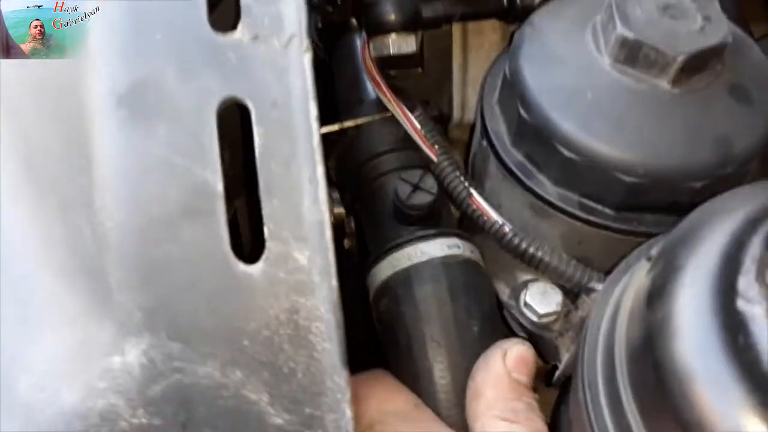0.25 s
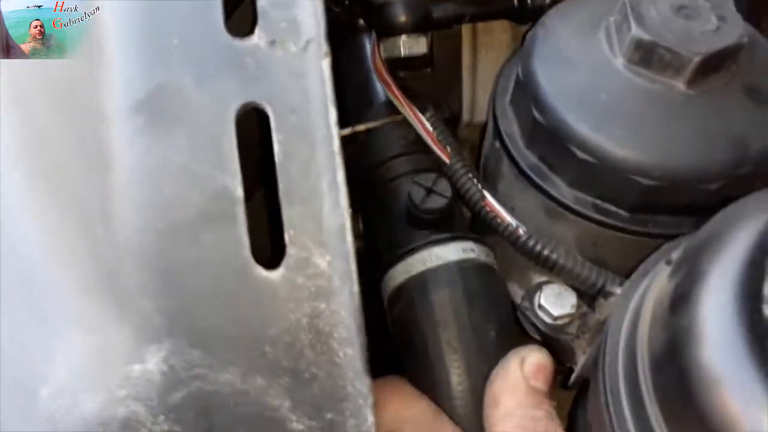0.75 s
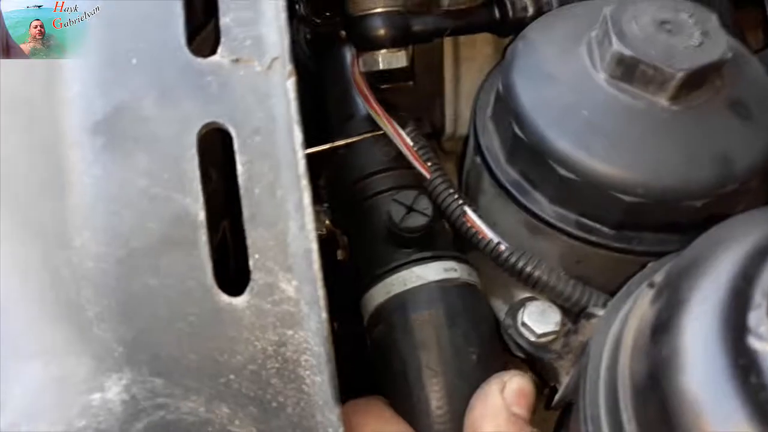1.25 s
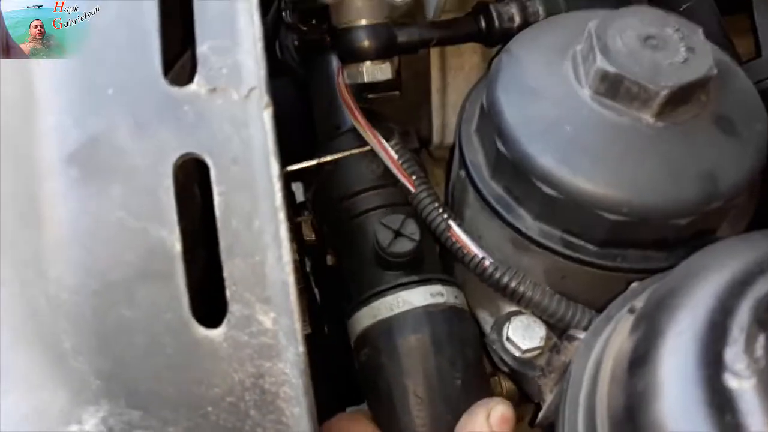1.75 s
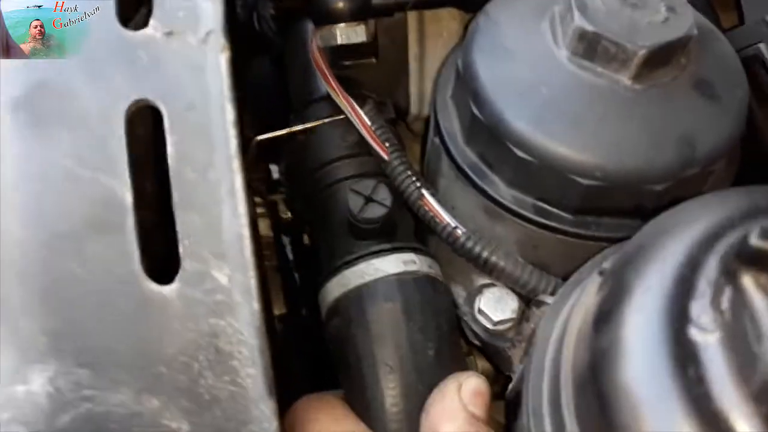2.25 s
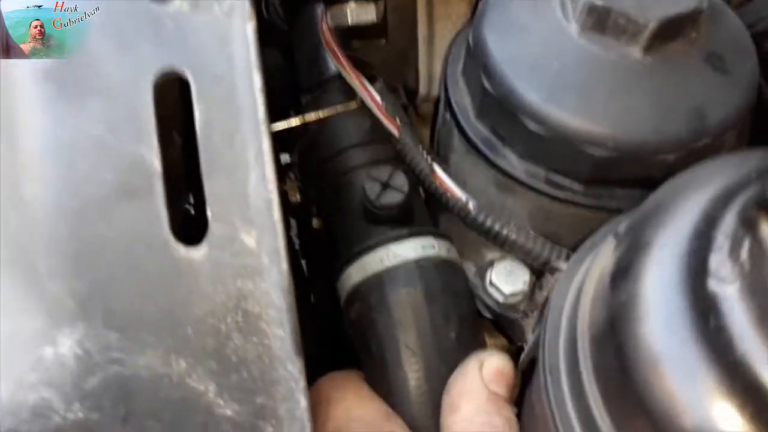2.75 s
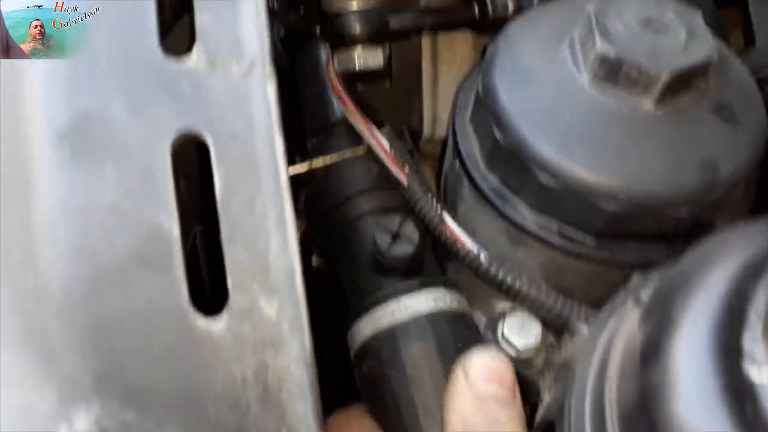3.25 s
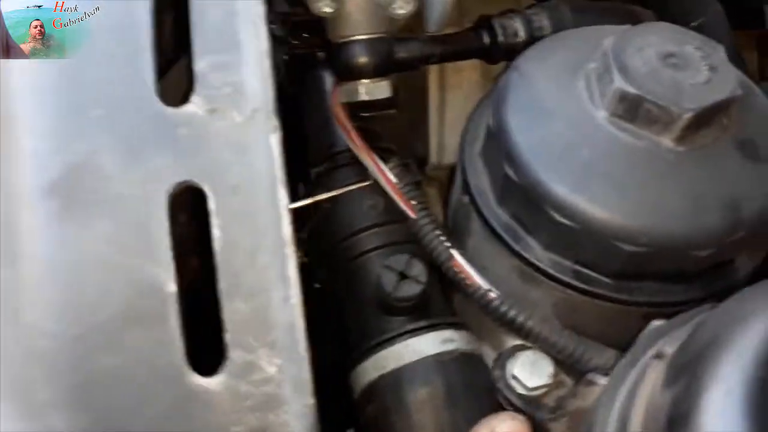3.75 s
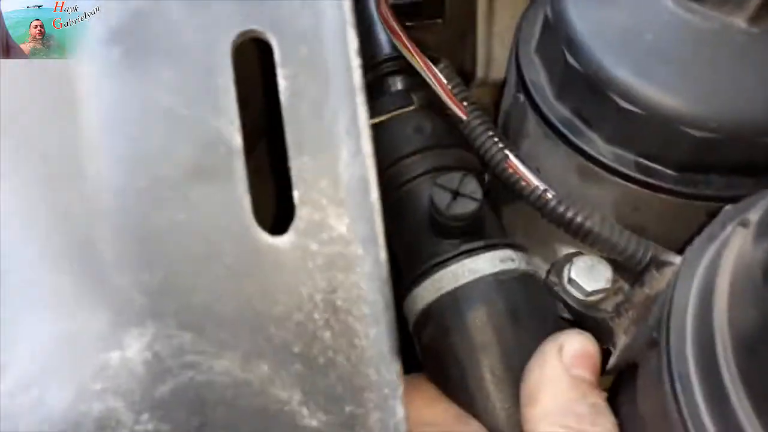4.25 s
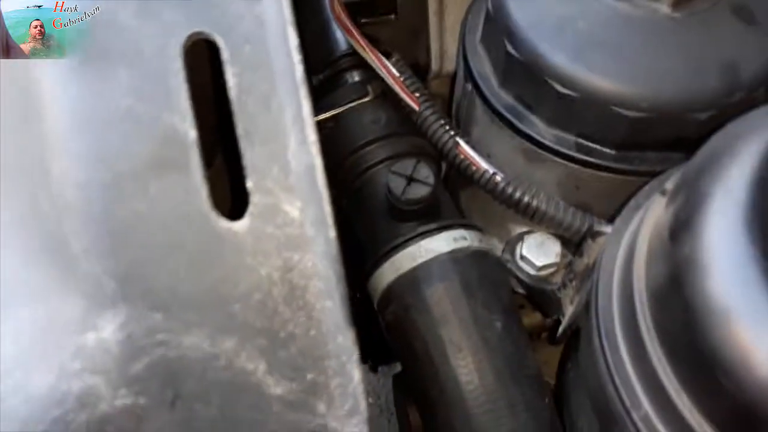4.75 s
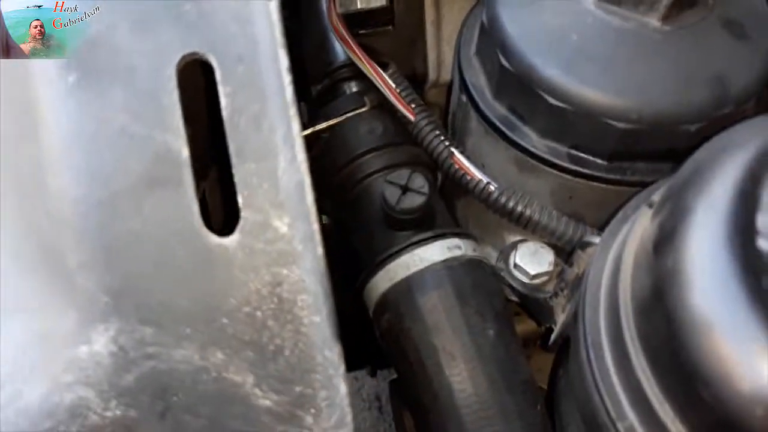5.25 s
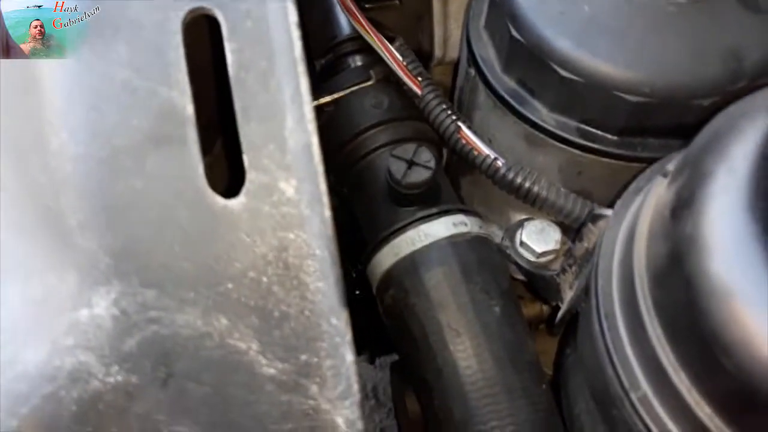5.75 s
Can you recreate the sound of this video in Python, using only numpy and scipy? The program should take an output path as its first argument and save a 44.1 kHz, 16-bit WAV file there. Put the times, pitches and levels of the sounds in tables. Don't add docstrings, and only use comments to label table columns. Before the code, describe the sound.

Close up in an engine bay, a hand works a rubber hose: low rubbing, plastic creaks and damped thuds. Coolant spatters in short spurts on metal and plastic, with ringing drips and bubbly gurgles. It thins out around the middle, then a sharp splashy burst comes just after four seconds and the hardest knock around five and a half. A faint low hum sits behind; near-mono, short metallic reflections.

```python
import sys
import numpy as np
from scipy import signal
from scipy.fft import rfft, irfft
from scipy.io import wavfile
from scipy.ndimage import uniform_filter1d

SR = 44100
rng = np.random.default_rng(int(sys.argv[2]) if len(sys.argv) > 2 else 0)


def linear_from_db(decibels):
    return 10 ** (np.asarray(decibels, float) / 20)


def to_wav(s):
    ch = np.atleast_2d(s).T
    pcm = np.round(np.clip(ch, -1, 1) * 32767)
    wavfile.write(sys.argv[1], SR, pcm.astype(np.int16))


N = 264600
T = np.arange(N) / SR


def rms_one(x):
    return x / np.sqrt(np.mean(x ** 2) + 1e-20)


def colour(x, spectrum):
    hz, db = np.transpose(spectrum)
    grid = np.linspace(1, SR / 2, 4097)
    log_gain = np.interp(np.log(grid), np.log(hz), np.maximum(db, -70)) * np.log(10) / 20
    cepstrum = irfft(log_gain)
    cepstrum[1:4096] *= 2
    cepstrum[4097:] = 0
    response = irfft(np.exp(rfft(cepstrum)))
    return signal.fftconvolve(x, response)[:len(x)]


def drift(rate):
    r = np.exp(-80 * np.pi * rate / SR)
    noise = rng.standard_normal(N // 40 + 2002)
    slow = signal.lfilter([1], [1, -2 * r, r * r], noise)[2000:]
    return np.interp(np.arange(N) / 40, np.arange(len(slow)), rms_one(slow))


def ring(clicks, hz, t60):
    r, w = linear_from_db(-60 / (t60 * SR)), 2 * np.pi * hz / SR
    return signal.lfilter([0, np.sin(w)], [1, -2 * r * np.cos(w), r * r], clicks + 1e-18)


def grains(per_s, spread_db, clump_db):
    size_db = spread_db * np.minimum(rng.exponential(1, N), 5) + clump_db * drift(25.7)
    sizes = linear_from_db(size_db) * rng.choice([-1, 1], N)
    return rms_one(sizes * (rng.random(N) < per_s / SR))


def droplets(clicks, spectrum, cycles, count=18):
    pitches = np.geomspace(spectrum[1][0], spectrum[-3][0], count)
    dealt = rng.integers(0, count, N)
    rings = sum(ring(clicks * (dealt == k), hz, cycles / hz) for k, hz in enumerate(pitches))
    return colour(rings, spectrum)


def struck(clicks, drops, spectrum, modes, ring_db, drop_db, cycles):
    crackle = rms_one(colour(clicks, spectrum))
    rings = sum(linear_from_db(db + 4.7 * drift(15.2)) * ring(clicks, hz, t60) for hz, t60, db in modes)
    pitched = rms_one(droplets(drops, spectrum, cycles))
    return rms_one(crackle + linear_from_db(ring_db) * rms_one(rings) + linear_from_db(drop_db) * pitched)


def swells(s, db, rise_s, fall_s):
    sparse = T[::32]
    late = sparse - s[:, None]
    drop = np.maximum(-late / rise_s[:, None], late / np.reshape(fall_s, (-1, 1)))
    gain = linear_from_db(db[:, None] - 12 * drop)
    return np.interp(T, sparse, gain.sum(axis=0))


def falls(events, t60s, rise_s):
    for (s, db, *_), t60 in zip(events, np.broadcast_to(t60s, len(events))):
        at = round(s * SR)
        t = T[:min(N - at, SR // 4)]
        yield at, t, linear_from_db(db - 60 * t / t60) * (1 - np.exp(-t / rise_s))


def tones(events, t60s, level_db, rise_s, glide, wobble_db, wobble_hz, wander=0.62):
    out, wobble = np.zeros(N), drift(wobble_hz)
    for (at, t, envelope), (_, _, hz, *_) in zip(falls(events, t60s, rise_s), events):
        phase = 2 * np.pi * hz * t * (1 + glide * t) + wander * wobble[at:at + len(t)]
        out[at:at + len(t)] += envelope * np.sin(phase)
    return linear_from_db(level_db + wobble_db * wobble) * out


def snaps(events, spectrum, level_db, t60):
    out = np.zeros(N)
    for at, t, envelope in falls(events, t60, rise_s=0.0015):
        out[at:at + len(t)] += envelope
    return linear_from_db(level_db) * out * rms_one(colour(rng.standard_normal(N), spectrum))


# (time [s], frequency [Hz], level [dB])
DRONE_PITCHES = [(0.0, 123, -34), (0.221, 107, -38), (0.77, 116, -45), (0.9, 95.1, -45), (1.069, 150, -40),
                 (1.321, 96.4, -69), (1.49, 150, -29.5), (1.62, 147, -43), (1.698, 104, -59),
                 (2.339, 149, -46.5), (2.46, 98.9, -56.5), (3.709, 92.2, -52.5), (4.459, 126, -51),
                 (4.66, 88.6, -58), (4.849, 124, -41.5), (5.35, 127, -44), (6.0, 102, -59)]


def drone(width_hz=8, broad_db=-6):
    s, hz, db = np.transpose(DRONE_PITCHES)
    pitch_hz = hz[np.searchsorted((s[1:] + s[:-1]) / 2, T)]
    phase = 2 * np.pi * np.cumsum(pitch_hz) / SR
    narrow = drift(width_hz / 2) * np.cos(phase) + drift(width_hz / 2) * np.sin(phase)
    narrow = narrow + 0.59 * np.sin(phase)
    band = signal.butter(2, [75, 170], "band", fs=SR, output="sos")
    broad = signal.sosfilt(band, rng.standard_normal(N))
    return linear_from_db(np.interp(T, s, db) - 6.5) * rms_one(rms_one(narrow) + linear_from_db(broad_db) * rms_one(broad))


def hiss_cut(x):
    return signal.sosfilt(signal.cheby2(12, 40, 15250, fs=SR, output="sos"), x)


# (frequency [Hz], level [dB per Hz])
AIR_SPECTRUM = [(15, -76), (25, -8), (107, 11.5), (169, -1.5), (267, -3.5), (650, -23), (1270, -21),
                (1670, -23.5), (3100, -40), (5460, -21), (7340, -66), (14400, -36.5), (15600, -33)]


def room_air():
    level_db = -52 + 2.76 * drift(1.94)
    return hiss_cut(linear_from_db(level_db) * rms_one(colour(rng.standard_normal(N), AIR_SPECTRUM)))


# (frequency [Hz], level [dB per Hz])
SIDE_SPECTRUM = [(180, -50), (300, -12), (661, -8.5), (1340, -11.5), (3210, -6.5), (15300, -11)]


def side_hiss(near):
    loudness = np.sqrt(uniform_filter1d(near ** 2, size=1024) + 1e-12) / linear_from_db(-48.0)
    hiss = hiss_cut(rms_one(colour(rng.standard_normal(N), SIDE_SPECTRUM)))
    return linear_from_db(-75.5) * loudness ** 0.033 * hiss


# (frequency [Hz], level [dB per Hz])
SPATTER_SPECTRUM = [(1000, -30), (1700, -9.5), (1940, -4.5), (2150, -8), (2730, -4), (3050, 4.5),
                    (4080, -1.5), (4890, -2.5), (8000, -25.5), (10400, -74), (17600, -120)]
# (frequency [Hz], T60 [s], level [dB])
SHIELD_MODES = [(2960, 0.0094, 8), (3110, 0.013, -16), (3600, 0.016, -6), (4640, 0.0086, -37),
                (2596, 0.0057, 3)]


def shield_spatter():
    wet = grains(8000, spread_db=2.5, clump_db=0.5)
    beads = grains(900, spread_db=1.5, clump_db=1.5)
    return struck(wet, beads, SPATTER_SPECTRUM, SHIELD_MODES, ring_db=-0.5, drop_db=-2.5, cycles=51)


# (time [s], level [dB])
TRICKLE_LEVELS = [(0.0, -54), (0.28, -51.5), (0.78, -55), (1.1, -47.5), (2.0, -63), (2.22, -65),
                  (2.54, -54), (2.99, -61.5), (3.16, -55.5), (3.56, -79), (4.16, -54), (4.34, -60.5),
                  (4.44, -63), (4.61, -56.5), (4.73, -56.5), (5.13, -51.5), (6.0, -50)]


def trickle(spatter):
    s, db = np.transpose(TRICKLE_LEVELS)
    trickle_db = np.interp(T, s, db)
    thin = signal.sosfilt(signal.butter(4, 2170, "high", fs=SR, output="sos"), spatter)
    return linear_from_db(trickle_db - 2.5) * thin, trickle_db


# (time [s], plastic creak level [dB], hose rub level [dB], build-up [s])
TUGS = [(0.0, -50.5, -34.5, .03), (0.381, -62, -38.5, 0.01), (.85, -65, -41, 0.16), (.95, -46.5, -58, 0.15),
        (1.05, -36.5, -38.5, 0.045), (1.219, -39, -40.5, 0.0094), (1.4, -46, -44, 0.071),
        (1.623, -41.5, -38.5, 0.06), (1.948, -49.5, -42, 0.044), (2.109, -53.5, -46, 0.022),
        (2.299, -56, -50.5, 0.069), (2.59, -46.5, -33, 0.047), (3.04, -43.5, -49, 0.04),
        (3.292, -43.5, -46.5, 0.14), (3.88, -57, -38.5, 0.17), (4.108, -39.5, -28, 0.0079),
        (4.48, -50.5, -78, 0.028), (4.83, -61, -44, 0.18), (4.98, -40.5, -46, 0.0073),
        (5.26, -45, -46.5, 0.13), (5.56, -38, -51, 0.018), (5.971, -45, -61, 0.097), (6.0, -70, -33, 0.067)]


def tug_gains():
    s, creak_db, rub_db, rise_s = np.transpose(TUGS)
    fall_s, rest_db = 0.085, -57
    twisting = swells(s, creak_db, rise_s, fall_s)
    rubbing = swells(s, rub_db, rise_s, fall_s) + linear_from_db(rest_db)
    return twisting, rubbing


# (frequency [Hz], level [dB per Hz])
CREAK_SPECTRUM = [(260, -28), (450, -10), (669, -7), (1100, 2), (1240, 5.5), (1440, -0.5), (2300, -1),
                  (2990, -65), (5060, -120)]
# (frequency [Hz], T60 [s], level [dB])
HOUSING_MODES = [(1240, 0.066, 1), (1010, 0.078, -2), (850, 0.034, 0), (775.5, 0.049, -2),
                 (1475, 0.079, -12.5), (2100, 0.029, -8)]


def housing_creak(twisting, trickle_db):
    dry_slips = grains(4000, spread_db=2.5, clump_db=-1.5)
    slips = grains(400, spread_db=1.2, clump_db=1.5)
    creak = struck(dry_slips, slips, CREAK_SPECTRUM, HOUSING_MODES, ring_db=-4.0, drop_db=-15.0, cycles=31)
    slack = signal.sosfilt(signal.butter(4, 1580, fs=SR, output="sos"), creak)
    return linear_from_db(-3.5) * (twisting * creak + linear_from_db(trickle_db - 3.5) * slack)


# (frequency [Hz], level [dB per Hz])
HOSE_SPECTRUM = [(88, -44), (150, -2.5), (264, 1.5), (436, -6.5), (478, -10.5), (650, -17.5), (840, -37.5),
                 (1430, -120)]


def hose_rub(rubbing):
    rub = grains(1500, spread_db=3.5, clump_db=1.16)
    return linear_from_db(-6.5) * rubbing * rms_one(colour(rub, HOSE_SPECTRUM))


# (frequency [Hz], level [dB per Hz])
SPRAY_SPECTRUM = [(3820, -43), (6500, -19), (6970, -14), (7530, -3.5), (9690, -11), (11600, -5),
                  (13700, -8), (15600, -10.5)]
# (time [s], level [dB], build-up [s], fall [s])
PUFFS = [(.9, -73, 0.11, 0.065), (1.05, -79, .2, .06), (2.61, -70, 0.082, 0.036), (4.01, -80, 0.058, .06),
         (4.107, -48, 0.0027, .01), (4.14, -62, 0.018, .03), (4.5, -59, 0.078, .06),
         (4.71, -58.5, 0.044, 0.046), (5.268, -54.5, 0.015, 0.03), (5.554, -58, .002, 0.0074),
         (5.585, -72, 0.028, 0.035), (5.677, -66, .003, .01), (5.75, -57, 0.015, 0.017),
         (5.97, -68, 0.047, .06)]


def fine_spray():
    mist = grains(9000, spread_db=3.0, clump_db=3.5)
    spraying = swells(*np.transpose(PUFFS)) + linear_from_db(-79)
    return linear_from_db(-4.0) * spraying * rms_one(colour(mist, SPRAY_SPECTRUM))


# (time [s], peak level [dB], ring frequency [Hz], T60 [s])
THUDS = [(0.025, -30, 200, 0.075), (.086, -37, 277, 0.048), (.165, -34, 273, 0.1), (0.374, -47, 304, .05),
         (0.413, -38.5, 450, 0.027), (0.779, -36.5, 395, 0.066), (1.214, -31, 175, 0.056),
         (1.365, -36, 376, 0.06), (1.564, -31.5, 160, 0.034), (1.939, -29, 232, 0.024),
         (1.955, -33.5, 250, 0.096), (2.552, -23, 318, 0.046), (3.154, -38, 395, 0.041),
         (3.583, -46, 300, 0.021), (3.636, -39, 253, 0.18), (3.737, -35.5, 296, 0.03),
         (3.776, -34, 258, 0.046), (3.81, -31, 265, 0.097), (3.835, -32, 250, .09), (3.894, -55, 346, .03),
         (3.924, -36, 234, 0.053), (4.744, -41, 260, 0.041), (4.106, -19, 303, 0.015),
         (4.127, -25.5, 254, 0.064), (5.555, -25, 214, 0.14), (5.675, -39.5, 258, 0.089),
         (5.953, -34, 356, 0.068), (5.965, -32, 272, .06), (5.984, -23.5, 259, 0.099),
         (4.971, -36, 230, 0.076), (5.351, -31.5, 230, 0.059)]


def hose_thuds():
    t60s = np.array(THUDS)[:, 3]
    thuds = tones(THUDS, t60s, level_db=-3.5, rise_s=0.001, glide=-1.1, wobble_db=-6.0, wobble_hz=31)
    return thuds + snaps(THUDS, HOSE_SPECTRUM, level_db=-5.5, t60=0.047)


# (time [s], length [s], level [dB])
ON_HOSE = [(0.145, 0.048, -52.5), (0.218, 0.021, -44), (0.362, 0.0061, -42), (0.463, 0.04, -46.5),
           (0.918, 0.035, -36.5), (1.502, 0.0079, -39), (1.603, 0.053, -44), (1.936, 0.0067, -42),
           (2.07, 0.076, -49), (2.538, 0.013, -41), (3.061, 0.052, -44.5), (3.282, 0.036, -41.5),
           (3.801, 0.061, -48), (4.995, 0.033, -44), (5.186, 0.1, -39.5), (5.906, 0.027, -41),
           (5.936, 0.029, -31.5)]
ON_SHIELD = [(.102, 0.03, -42.5), (.388, 0.024, -43.5), (.433, 0.028, -44), (1.036, 0.064, -41.5),
             (1.21, 0.022, -35.5), (3.018, 0.033, -43.5), (3.207, 0.031, -43.5), (3.249, 0.017, -42),
             (3.618, 0.031, -52), (4.753, 0.027, -52), (4.965, 0.023, -34), (5.028, 0.063, -40.5),
             (5.561, .036, -32), (5.545, 0.0054, -32), (5.602, 0.014, -42), (5.615, 0.049, -43),
             (5.843, 0.019, -43)]
ON_BRACKET = [(1.689, 0.016, -44), (1.707, 0.042, -47.5), (2.227, 0.025, -50), (2.398, 0.085, -49),
              (2.551, 0.055, -40.5), (2.988, 0.048, -44.5), (3.335, .05, -53), (3.468, 0.026, -50.5),
              (3.517, .01, -53), (3.583, 0.031, -54), (3.962, 0.051, -44.5), (3.92, 0.026, -56),
              (4.118, 0.012, -31.5), (4.129, 0.015, -24.5), (4.216, 0.0091, -71), (4.232, 0.018, -49),
              (4.312, 0.039, -50), (4.651, 0.048, -43), (4.77, 0.083, -48.5), (5.384, 0.011, -38.5),
              (5.735, 0.017, -34), (5.963, 0.031, -38.5)]
ON_WIRES = [(0.703, 0.0048, -44.5), (.849, 0.058, -44), (.95, 0.098, -45.5), (1.291, 0.085, -47),
            (1.809, 0.0073, -48), (1.898, 0.061, -51), (2.029, 0.0071, -48.5), (2.253, 0.015, -46),
            (2.277, 0.045, -48.5), (2.598, 0.045, -51), (2.652, 0.0069, -45), (3.54, 0.0099, -52),
            (3.669, 0.07, -50), (4.104, 0.0049, -22.5), (4.354, 0.067, -44.5), (4.415, 0.083, -39),
            (4.512, 0.048, -49), (4.688, .043, -39), (5.251, 0.02, -36.5), (5.664, 0.015, -48)]
SHARPNESS = [1.03, 2.8, 1.55, 1.12]


def spurts(spatter, peak_db=1.5, edge_s=0.0024):
    out, flow = np.zeros(N), np.zeros(N)
    surfaces = (ON_HOSE, ON_SHIELD, ON_BRACKET, ON_WIRES)
    brightest_hz = (2070, 2950, 3570, 5100)
    for rows, hz, sharpness in zip(surfaces, brightest_hz, SHARPNESS):
        for s, length_s, db in rows:
            at = round(s * SR)
            t = T[:min(N - at, round((2 * length_s + 6 * edge_s) * SR))]
            soft_s = edge_s + 0.12 * length_s
            rise = 1 - np.exp(-t / (0.75 * soft_s))
            gate = linear_from_db(db) * rise * np.exp(-np.maximum(t - length_s, 0) / soft_s)
            part = spatter[at:at + len(t)]
            bright = signal.lfilter(*signal.iirpeak(hz, sharpness, fs=SR), part)
            out[at:at + len(t)] += gate * rms_one(part + linear_from_db(peak_db) * rms_one(bright))
            flow[at:at + len(t)] += gate
    return linear_from_db(-3.5) * out, flow


# (time [s], peak level [dB], frequency [Hz])
DROPS = [(.105, -37, 3120), (0.142, -36, 3080), (.995, -43, 1250), (1.04, -35, 2910), (1.062, -39, 1263),
         (1.112, -35.5, 2930), (1.23, -36, 992), (1.305, -39.5, 1248), (1.396, -40, 3030),
         (1.43, -44.5, 3000), (1.58, -40, 3020), (1.78, -48.5, 1247), (.445, -40, 3320), (1.64, -38, 2750),
         (2.122, -46, 2110), (2.252, -41, 4910), (2.28, -47.5, 1380), (2.296, -39.5, 3030),
         (2.652, -40, 5000), (3.041, -35, 1243), (3.22, -46, 1308), (3.258, -36, 3300), (3.484, -49, 3180),
         (3.519, -56, 4280), (3.545, -51, 3020), (3.595, -46.5, 3500), (3.625, -48, 1300),
         (3.632, -42, 2960), (3.782, -45, 2450), (3.92, -48, 3550), (3.945, -49.5, 1390), (4.37, -47, 1380),
         (4.398, -46, 1420), (4.466, -38.5, 1292), (4.489, -32.5, 3224), (4.499, -45, 1400),
         (4.7, -36, 4870), (4.809, -52, 404), (4.87, -50.5, 1210), (5.006, -43, 1200), (5.039, -40, 1196),
         (5.075, -42, 1204), (4.756, -37.5, 3100), (4.97, -36, 2950), (4.97, -35, 1150),
         (5.506, -37.5, 3605), (5.074, -38, 2950), (5.217, -51, 6740), (5.264, -34, 4790),
         (5.352, -38, 506), (5.576, -42, 6720), (5.577, -24, 2830), (5.609, -33, 2870), (5.628, -53, 7000),
         (5.645, -53, 7000), (5.795, -62, 7800), (5.848, -34, 2730)]


def ringing_drops():
    t60s = 0.044 + 20 / np.array(DROPS)[:, 2]
    return tones(DROPS, t60s, level_db=2.0, rise_s=0.0025, glide=0.14,
                 wobble_db=4.0, wobble_hz=122, wander=1.0)


# (time [s], peak level [dB], frequency [Hz])
BUBBLES = [(.112, -38, 1800), (.122, -39, 4970), (.158, -37.5, 1960), (.405, -38.5, 1390),
           (.470, -39.5, 2000), (.825, -36.5, 416), (1.616, -27.5, 1010), (2.105, -36.5, 268),
           (2.295, -50, 780), (2.532, -39, 2070), (3.499, -43.5, 1380), (5.022, -38, 872),
           (5.045, -36, 889), (5.203, -40, 1920), (5.234, -31, 1973), (5.948, -26, 1274)]


def soft_bubbles():
    t60s = 0.043 + 35 / np.array(BUBBLES)[:, 2]
    return tones(BUBBLES, t60s, level_db=-0.5, rise_s=0.0059, glide=0.68,
                 wobble_db=5.0, wobble_hz=109, wander=0.68)


# (time [s], peak level [dB], ring frequency [Hz], crack relative level [dB])
KNOCKS = [(0.781, -42.5, 3320, 11.5), (0.3749, -25, 3550, 8), (0.4442, -20, 3100, -9),
          (0.929, -29, 2960, 9.5), (1.2109, -14, 3080, -6), (1.506, -35, 2020, -6), (1.567, -32.5, 2860, 0),
          (1.6086, -29.5, 2980, 6.5), (1.689, -30, 3500, -1), (1.9372, -28, 3300, 3.5),
          (2.802, -37, 3120, 0), (2.9, -46, 3000, 1), (.59, -42, 2590, -2), (.805, -43.5, 3630, -4),
          (3.2132, -28, 2880, -1), (3.247, -24, 3170, -18), (3.464, -37, 2990, 4),
          (3.622, -21.5, 2860, -12), (3.8114, -33.5, 3970, 7), (4.107, -26.5, 3230, 9),
          (4.2176, -16.5, 3220, -27), (4.314, -28.5, 3250, -19), (4.444, -15.5, 3530, -19),
          (4.4892, -18.5, 3110, -15), (4.7549, -28, 3130, 2), (4.972, -15.5, 2960, -6),
          (5.221, -18, 2950, -8), (5.459, -31.5, 2960, 2), (5.5052, -24, 3570, -12),
          (5.5535, -5, 3060, -4.5), (5.675, -18, 4900, 0), (5.748, -19.5, 3655, -0.5)]
# (frequency [Hz], level [dB per Hz])
CRACK_SPECTRUM = [(240, -0.5), (400, -2), (860, -18), (1690, -6.5), (3360, -2.5), (5000, -9), (8800, -47),
                  (11100, -68), (15500, -34)]


def knocks():
    drips = tones(KNOCKS, t60s=0.022, level_db=-11.5, rise_s=0.00063, glide=0.97,
                  wobble_db=5.0, wobble_hz=150)
    hits = [(s, db + rel_db) for s, db, hz, rel_db in KNOCKS]
    return drips + snaps(hits, CRACK_SPECTRUM, level_db=-9.0, t60=0.027)


# (time [s], peak level [dB], ring frequency [Hz])
GURGLES = [(0.379, -39, 1940), (0.78, -38, 1900), (0.933, -24, 625), (1.035, -44, 1130), (1.196, -39, 1240),
           (1.219, -43, 1220), (1.311, -33.5, 1010), (1.612, -25.5, 1240), (2.396, -41.5, 1440),
           (2.586, -31.5, 1090), (3.027, -26.5, 1265), (3.29, -36.5, 1286), (3.563, -42.5, 1293),
           (3.653, -37, 1270), (3.777, -42, 750), (3.811, -45, 1320), (3.856, -34, 654), (4.136, -25, 1886),
           (4.821, -42, 700), (3.895, -47, 1295), (4.967, -30.5, 1170), (5.552, -37, 1240),
           (5.677, -30.5, 1326), (5.729, -32, 1260),]


def hose_gurgles():
    wet_t60s = np.where(np.array(GURGLES)[:, 2] > 900, .065, .025)
    gurgles = tones(GURGLES, wet_t60s, level_db=-7.5, rise_s=0.00077, glide=0.77,
                    wobble_db=6.0, wobble_hz=87, wander=0.93)
    return gurgles + snaps(GURGLES, CREAK_SPECTRUM, level_db=-12.5, t60=0.07)


# (time [s], peak level [dB], frequency [Hz])
TAPS = [(.415, -31, 604), (.78, -42, 500), (.934, -29, 603), (1.365, -40, 500), (3.155, -33, 505),
        (3.577, -48, 590), (3.585, -31.5, 446), (3.737, -30, 605), (3.778, -33, 500), (3.856, -30, 700),
        (3.894, -39, 700), (4.106, -19, 500), (4.142, -24, 755), (4.19, -36, 660), (4.821, -33, 600),
        (5.28, -25, 350), (5.343, -28, 830), (5.493, -28, 680), (5.91, -36, 610)]


def finger_taps():
    return tones(TAPS, t60s=0.0045, level_db=1.0, rise_s=0.00014, glide=-3.0,
                 wobble_db=2.7, wobble_hz=40, wander=0.17)


def handling():
    spatter = shield_spatter()
    trickling, trickle_db = trickle(spatter)
    twisting, rubbing = tug_gains()
    splash, flow = spurts(spatter)
    flow = flow + linear_from_db(trickle_db)
    surge = flow / uniform_filter1d(flow, size=SR // 10)
    creak = surge ** 0.55 * housing_creak(twisting, trickle_db)
    spray = surge ** 0.14 * fine_spray()
    return trickling + splash + creak + hose_rub(rubbing) + spray


def bay(x, t60_s=0.082, level_db=-9.5):
    t = T[:SR // 4]
    tail = rng.standard_normal(len(t)) * linear_from_db(-60 * t / t60_s) * (t > .002)
    tail = tail / np.sqrt(np.sum(tail ** 2))
    return x + linear_from_db(level_db) * signal.fftconvolve(x, tail)[:N]


def scene():
    events = hose_thuds() + ringing_drops() + soft_bubbles() + knocks() + hose_gurgles() + finger_taps()
    near = bay(handling() + events)
    mid = near + drone() + room_air()
    side = side_hiss(near)
    return np.array([mid + side, mid - side])


def roll_off(x):
    return signal.sosfilt(signal.butter(12, 15600, fs=SR, output="sos"), x)


def record(dry):
    cut = signal.sosfilt(signal.cheby2(12, 40, 15600, fs=SR, output="sos"), dry)
    cut = signal.sosfilt(signal.butter(3, 45, "high", fs=SR, output="sos"), cut)
    return roll_off(cut)


dry = scene()
out = record(dry)
to_wav(out)
```